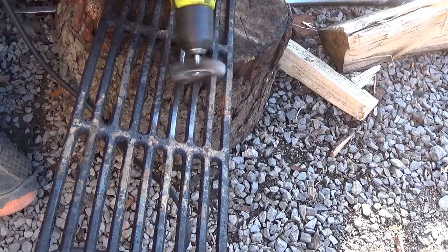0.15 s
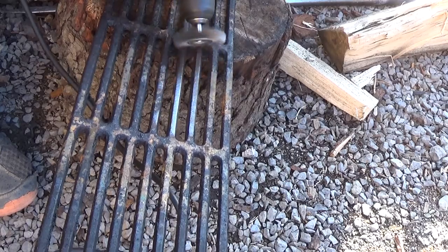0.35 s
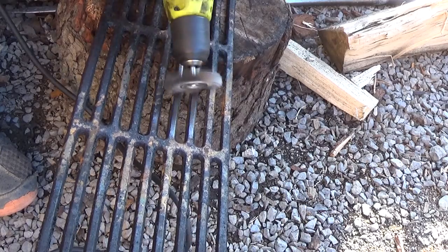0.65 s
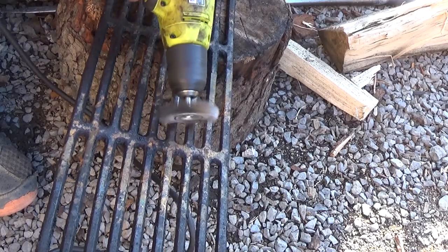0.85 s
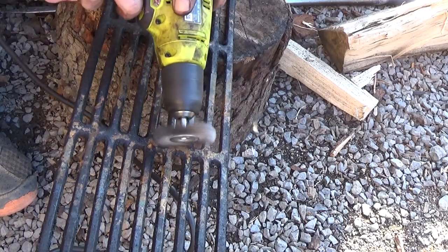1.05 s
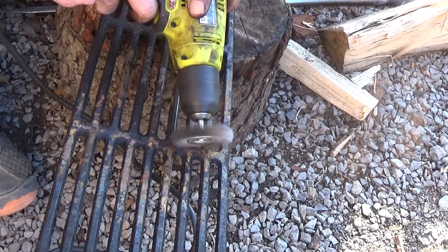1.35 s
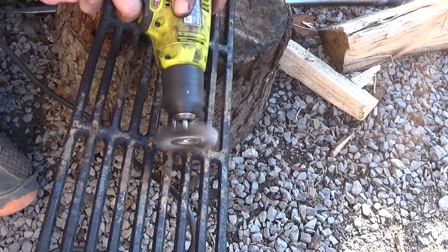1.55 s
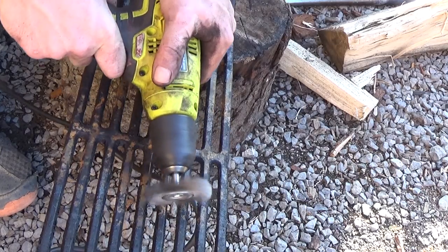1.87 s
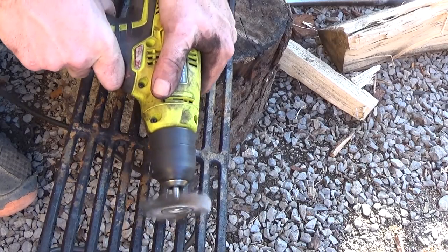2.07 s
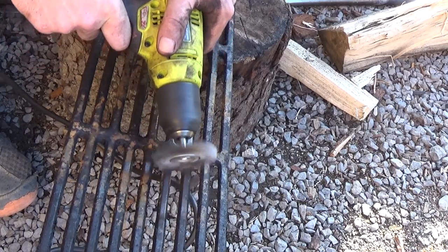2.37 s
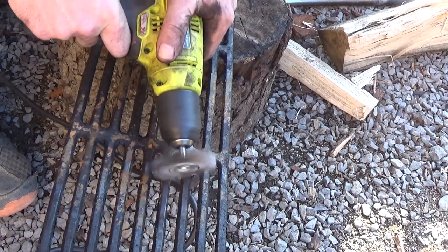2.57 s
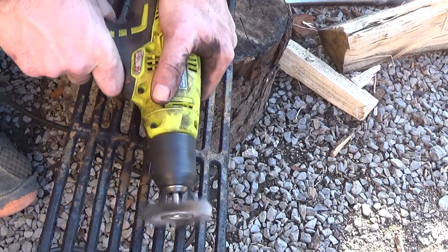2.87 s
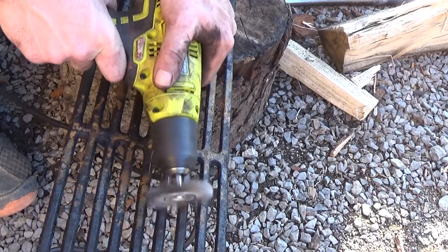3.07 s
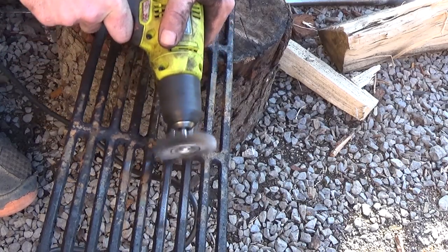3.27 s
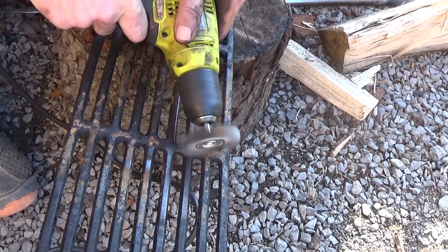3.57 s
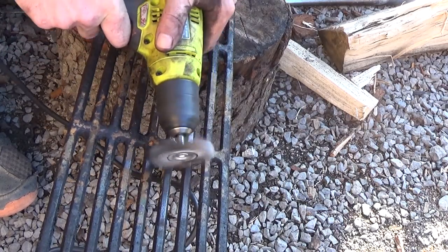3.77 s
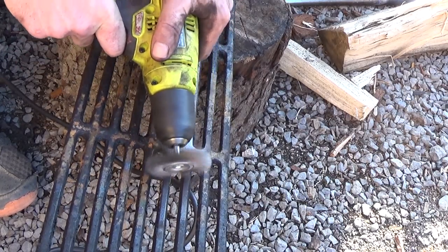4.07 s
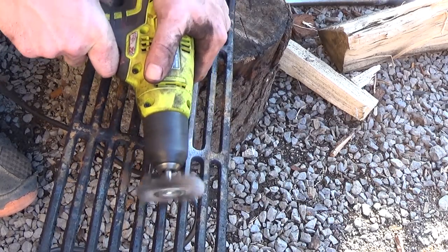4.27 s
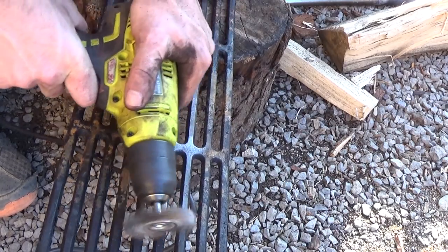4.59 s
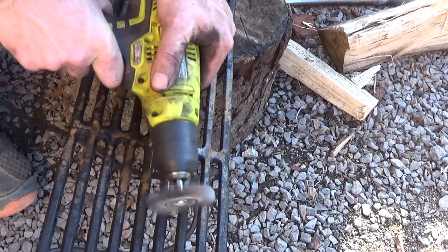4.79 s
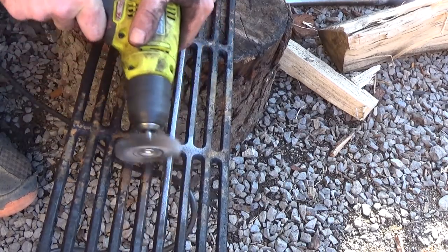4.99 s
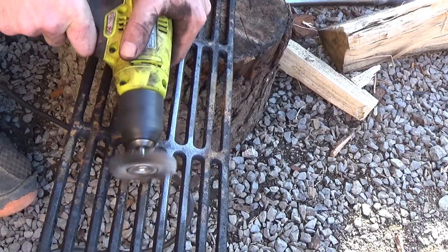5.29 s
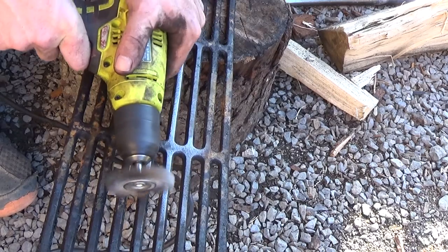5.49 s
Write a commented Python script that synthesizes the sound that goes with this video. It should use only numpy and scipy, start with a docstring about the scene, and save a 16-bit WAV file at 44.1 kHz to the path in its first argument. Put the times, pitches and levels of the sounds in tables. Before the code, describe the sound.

Close, continuous rasping of a spinning wire brush on metal bars, with gear whine rising when pressure eases and the sound cutting out once early on.

```python
"""Outdoors, close up: an electric drill spins a wire wheel along a rusty iron grate.
Thousands of random bristle strikes a second are filtered into a harsh scrape and ring the iron bars.
Motor and gear tones follow the shaft speed, which rises when the hand eases off; some swell near the middle rib.
A low rumble and a faint drone lie behind. The sound drops out once for about a third of a second."""
import sys
import numpy as np
from scipy import signal
from scipy.fft import rfft, irfft
from scipy.io import wavfile
from scipy.ndimage import uniform_filter1d

SR = 44100
rng = np.random.default_rng(int(sys.argv[2]) if len(sys.argv) > 2 else 0)


def dump_mix(stems):
    """Bounce the given channels to the path in sys.argv[1] as a 16-bit WAV at rate SR."""
    frames = np.atleast_2d(stems).T  # one column per channel
    limited = np.clip(frames, -1, 1)  # hard clip at full scale
    pcm = np.round(limited * 32767).astype(np.int16)
    wavfile.write(sys.argv[1], SR, pcm)


N = 248724  # length in samples
TIME = np.arange(N) / SR  # seconds
FREQ = np.fft.rfftfreq(N, 1 / SR)  # Hz


def undb(db):
    """Turn decibels into a gain."""
    return 10 ** (np.asarray(db) / 20)


def unit(x):
    """Scale to an rms (average strength) of 1."""
    return x / np.sqrt(np.mean(x ** 2))


def curves(rows):
    """Join the rows of a timed table with straight lines, giving each column a value at every sample."""
    seconds, *columns = np.transpose(rows)
    return [np.interp(TIME, seconds, column) for column in columns]


def slope(points):
    """Gain at every frequency, from rows of Hz and dB."""
    hz, db = np.transpose(points)
    return undb(np.interp(np.log(FREQ + 1), np.log(hz), db))


def shape(x, response):
    """Filter a sound by multiplying its spectrum with a frequency response."""
    return irfft(rfft(x) * response, N)


def resonance(hz, width):
    """Response of one damped vibration, with a gain of 1 at its centre."""
    return 1j * FREQ * width / (hz ** 2 - FREQ ** 2 + 1j * FREQ * width)


def walk(rate):
    """Smooth random drift of rms 1, changing about `rate` times a second."""
    noise = rng.standard_normal(N)
    return unit(shape(noise, 1 / (1 + (FREQ / rate) ** 4)))


def tone(turns, slip, flutter_db):
    """A sine of rms 1 whose phase (slip, radians) and strength (flutter, dB) shake at random."""
    phase = 2 * np.pi * turns + slip * walk(22)
    return unit(np.sin(phase) * undb(flutter_db * walk(13)))


def strikes(wheel_turns, per_second, spread_db, wobble_db, clump_db):
    """Bristle tips snap off the bars: in clumps, and harder once a turn of the uneven wheel."""
    hit = rng.random(N) < per_second / SR
    size = rng.choice([-1, 1], N) * undb(spread_db * rng.standard_normal(N))
    contact_db = wobble_db * np.sin(2 * np.pi * wheel_turns) + clump_db * walk(240)
    return unit(hit * size * undb(contact_db))


def wander(x, patchy_db, bins=5, frame_count=41):
    """Let the colour drift in patches a few hundred Hz wide and about a quarter of a second long."""
    _, _, frames = signal.stft(x, nperseg=512)
    field = rng.standard_normal(frames.shape)
    for _ in range(2):  # smooth the random field twice, across pitch and then across time
        field = uniform_filter1d(field, bins, axis=0, mode="wrap")
        field = uniform_filter1d(field, frame_count, axis=1, mode="wrap")
    _, drifting = signal.istft(frames * undb(patchy_db * unit(field)))
    return drifting[:N]


# Colour of the bristle strikes. Each row: pitch in Hz, relative strength in dB per Hz.
BRISTLES = [(100, -42), (300, -30.5), (450, -20), (850, -13.5), (1300, -6.5), (2300, -5.5), (3300, 0),
            (4300, 0), (6300, 0.5), (7400, -2.5), (9300, -1), (11000, -8.5), (13000, -10.5), (15000, -16)]
# Broad resonances of the wire wheel. Each row: centre in Hz, width in Hz, lift in dB.
WHEEL = [(694, 97, 2), (1420, 150, 1.5), (2170, 120, 1.5), (2690, 310, 3.5), (3110, 270, 1.5),
         (3660, 230, 2), (6250, 900, 1.5), (8250, 600, 1.5), (11650, 400, 0)]
SCRAPE_DB, BRIGHT_DB = -16.5, 0.3  # level; treble is raised and the rest lowered by the second


def scrape(force):
    """The wire wheel gives off the strikes as a harsh scrape, coloured by its broad resonances."""
    lift_db = sum(db * np.abs(resonance(hz, width)) ** 2 for hz, width, db in WHEEL)
    sound = shape(force, slope(BRISTLES) * undb(lift_db))
    # as the wheel travels, the bent wires and the bars under them keep changing their resonances
    sound = wander(sound, patchy_db=1.0)
    treble = shape(sound, 1 - 1 / (1 + (FREQ / 5500) ** 4))  # above about 5500 Hz
    rest = sound - treble
    return undb(SCRAPE_DB) * unit(treble * undb(BRIGHT_DB) + rest * undb(-BRIGHT_DB))


# Ringing modes of the iron grate. Each row: pitch in Hz, width in Hz, # base level in dB when brushed at the
# far end, base level in dB when brushed on the near part, up to the near end.
GRATE = [(754, 65, -43.5, -57.5), (889, 110, -39.5, -58.5), (1355, 130, -47, -47.5), (1560, 63, -35.5, -52),
         (2010, 130, -37.5, -58), (2670, 119.4, -37.5, -44), (3400, 88, -43.5, -37), (3663, 76, -46, -34),
         (3795, 97, -38.5, -34), (5720, 150, -34.5, -36), (6440, 200, -44.5, -32.5), (9300, 90, -34.5, -48),
         (11530, 130, -39.5, -50.5)]
FAR_MODES_END, NEAR_MODES_START = 0.28, 0.63  # places between which the ring changes colour
RING_DB, RIB_RING_DB = 1, 4  # lift of the ring everywhere, and extra under a light touch on the rib


def grate(blows, place, on_rib, eased):
    """Bristle blows keep the iron bars ringing; the place of contact picks the modes."""
    far_response = near_response = 0
    for hz, width, far_db, near_db in GRATE:
        # even out the loudness of narrow and wide modes
        mode = resonance(hz, width) / np.sqrt(np.pi * width / SR)
        far_response = far_response + mode * undb(far_db)
        near_response = near_response + mode * undb(near_db)
    far = shape(blows, far_response)
    near = shape(blows, near_response)
    share = np.clip((place - FAR_MODES_END) / (NEAR_MODES_START - FAR_MODES_END), 0, 1)
    ring_db = RING_DB + RIB_RING_DB * on_rib * eased
    return ((1 - share) * far + share * near) * undb(ring_db)


# Shaft speeds that mark the load: in Hz when bearing down, at a steady push, and eased off.
LOAD_HZ = (495.8, 499.5, 517)


def load_shares(shaft_hz):
    """How far the hand bears down, pushes steadily or eases off; the three shares add up to 1."""
    states = np.eye(len(LOAD_HZ))
    return np.array([np.interp(shaft_hz, LOAD_HZ, state) for state in states])


# Hum at shaft speed: level in dB when bearing down, at a steady push, and eased off.
HUM_DB = (-46, -43.3, -43)
# Gear and commutator tones. Each row: multiple of the shaft speed, then the level away from the rib
# in dB when bearing down, at a steady push, and eased off.
GEAR_TONES = [(.572, -55, -75, -76), (1.433, -53, -53.5, -61.5), (2.757, -42, -52, -58.5),
              (3.98, -52, -41, -46.5), (6.51, -34.5, -32.5, -38), (7.05, -35, -49, -38.5),
              (9.97, -40.5, -39.5, -48), (12.03, -32.5, -34.5, -34.5), (13.1, -35, -35, -41),
              (13.53, -30.5, -35, -44.5), (18.95, -48, -40, -48), (24.2, -46, -54, -56)]
OCTAVE_DB, PRESSED_OCTAVE_DB = -54, 5.5  # the hum's octave away from the rib, and its rise when bearing down
RIB_OCTAVE_DB, RIB_GEAR_DB = 10.5, 2.5  # the drill sings louder against the stiff rib
WHINE_ORDER = 17  # pitch of the high whine, as a multiple of the shaft speed
WHINE_SLIP, RATTLE_SLIP = 0.35, 0.2  # phase shake of the whine and the extra when eased off, radians


def drill(turns, load, on_rib, whine_db):
    """The turning shaft hums with its octave and a high whine; the mix of gear tones follows the load."""
    pressed, _, eased = load
    hum = undb(np.array(HUM_DB) @ load) * tone(turns, slip=0.08, flutter_db=0.8)
    octave_db = OCTAVE_DB + RIB_OCTAVE_DB * on_rib + PRESSED_OCTAVE_DB * pressed
    octave = undb(octave_db) * tone(2 * turns, slip=0.1, flutter_db=1.5)
    # unloaded gears rattle in their play, which blurs the whine
    whine_slip = WHINE_SLIP + RATTLE_SLIP * eased
    whine = undb(whine_db) * tone(WHINE_ORDER * turns, whine_slip, flutter_db=2.0 + 1.2 * eased)
    gears = 0
    for multiple, *load_db in GEAR_TONES:
        gear_db = np.array(load_db) @ load + RIB_GEAR_DB * on_rib
        slip = 0.12 * np.sqrt(multiple)  # play between the teeth shakes the phase of high tones most
        gears = gears + undb(gear_db) * tone(multiple * turns, slip, flutter_db=2.0)
    return hum + octave + whine + gears


# Width of the stereo image. Each row: pitch in Hz, level of the side sound against the middle in dB.
WIDTH = [(100, -54.5), (500, -51), (1000, -39), (2500, -22.5), (4000, -24), (6300, -20), (8000, -15.5),
         (10000, -23.5), (13000, -53)]


def stereo_spread(tool):
    """A short burst of fading noise smears the tool into a faint side sound that widens the image."""
    burst = rng.standard_normal(N) * np.exp(-TIME / 0.015)
    response = rfft(burst) / np.sqrt(np.sum(burst ** 2))
    return shape(tool, response * slope(WIDTH))


# A faint low drone that dips, then climbs like a distant engine.
# Each row: time in seconds, pitch in Hz, level in dB.
DRONE = [(0, 121, -59), (1.24, 121, -64.5), (2.9, 125, -66.5), (3.37, 82, -78), (3.51, 93, -51),
         (3.72, 124.3, -59), (4.2, 126, -55), (4.42, 139.8, -62), (4.6, 148.3, -71)]
# Colour of the outdoor rumble. Each row: pitch in Hz, relative strength in dB per Hz.
RUMBLE = [(20, -10), (45, -4.5), (90, 2), (140, 0.5), (190, -5.5), (300, -7), (600, -25), (2000, -48.5)]


def outdoors():
    """Filtered noise makes a low rumble and a shaky sine makes a drone, both far below the tool."""
    hz, db = curves(DRONE)
    drone = undb(db) * tone(np.cumsum(hz) / SR, slip=0.38, flutter_db=3.0)
    rumble = unit(shape(rng.standard_normal(N), slope(RUMBLE)))
    return drone + undb(-62.0) * rumble


# The motor, slower the harder the hand pushes.
# Each row: time in seconds, average shaft speed in Hz, level of the high whine in dB.
MOTOR = [(0, 494, -40), (.45, 495.5, -34), (1.24, 495.6, -26), (1.62, 500.8, -23), (2.0, 497.3, -30),
         (2.3, 500.3, -27.5), (2.7, 500.3, -31), (3.05, 503, -27), (3.35, 503, -29), (3.58, 510.5, -44),
         (3.8, 526, -30), (3.98, 521.8, -28), (4.15, 516.8, -37), (4.52, 504.5, -28), (4.77, 523.3, -27),
         (5.0, 524, -29), (5.18, 516, -32), (5.52, 509.7, -28)]
# Strokes of the hand. Each row: time in seconds, place of the wheel from 0 (far end) to 1 (near end).
PLACE = [(.55, 0.24), (1.0, 0.4), (1.62, .58), (2.05, 0.99), (2.55, 0.55), (2.98, 1), (3.3, 0.53),
         (4.12, 0.64), (4.52, 0.77), (4.82, 1), (5.08, 0.64), (5.32, 0.57), (5.64, 1)]
GEAR_RATIO = 13.7  # motor turns per turn of the wheel
RIB_PLACE, RIB_REACH = 0.52, 0.2  # the cross rib: its place and how far its effect spreads


def scene():
    """Hand and motor drive scrape, bars and drill in the middle, slightly widened, over the outdoors."""
    shaft_hz, whine_db = curves(MOTOR)
    place, = curves(PLACE)
    load = load_shares(shaft_hz)
    _, _, eased = load
    on_rib = np.exp(-((place - RIB_PLACE) / RIB_REACH) ** 2)
    unsteady_hz = shaft_hz * (1 + 0.00047 * walk(9.7))
    turns = np.cumsum(unsteady_hz) / SR
    wheel_turns = turns / GEAR_RATIO
    force = strikes(wheel_turns, per_second=24000, spread_db=2.0, wobble_db=0.14, clump_db=0.71)
    # the bars take their own share of the blows
    blows = strikes(wheel_turns, per_second=9000, spread_db=2.5, wobble_db=0.7, clump_db=1.5)
    bars = grate(blows, place, on_rib, eased)
    tool = scrape(force) + bars + drill(turns, load, on_rib, whine_db)
    side = stereo_spread(tool)
    left = undb(-0.53) * (tool + side)
    right = undb(-0.6) * (tool - side)
    return np.array([left, right]) + outdoors()


# The dropout: its start and its end in seconds.
DROPOUT_S = (1.2492, 1.6096)
TOP_HZ = 15050  # highest pitch let through


def record(dry):
    """The level falls at once by 25 dB, dies within milliseconds and later returns; the top is cut off."""
    stop, resume = DROPOUT_S
    fade = undb(-25) * np.exp(-np.maximum(TIME - stop, 0) / 0.004)
    gate = np.where((TIME < stop) | (TIME > resume), 1, fade)
    low_pass = signal.ellip(12, 0.1, 80, TOP_HZ, fs=SR, output="sos")
    return signal.sosfilt(low_pass, dry * gate)


dry = scene()
out = record(dry)
dump_mix(out)
```